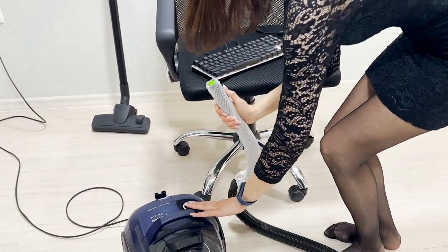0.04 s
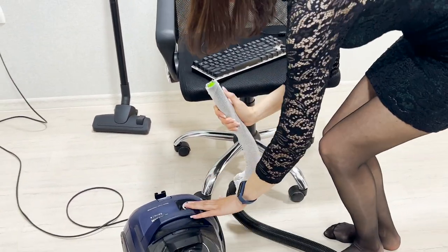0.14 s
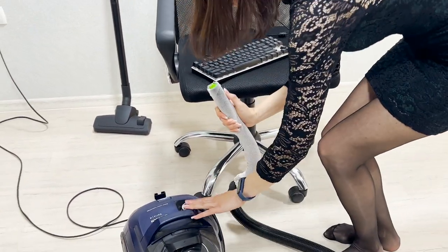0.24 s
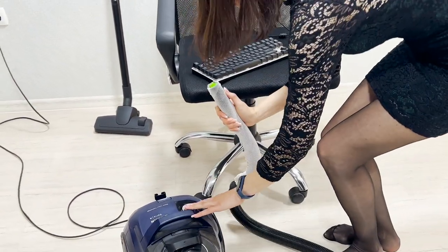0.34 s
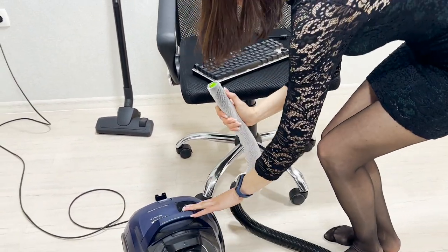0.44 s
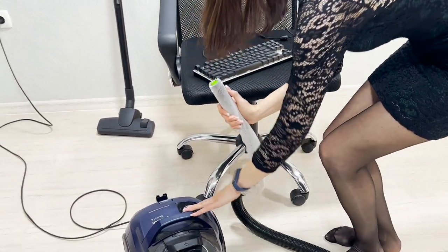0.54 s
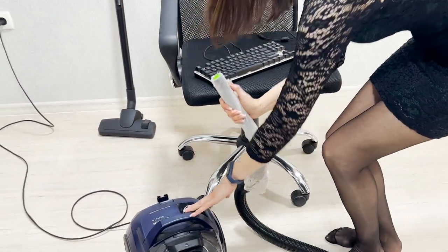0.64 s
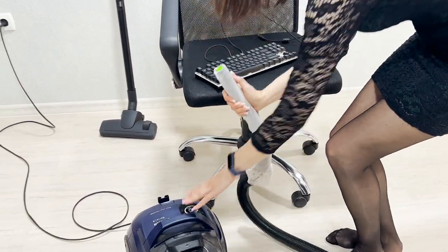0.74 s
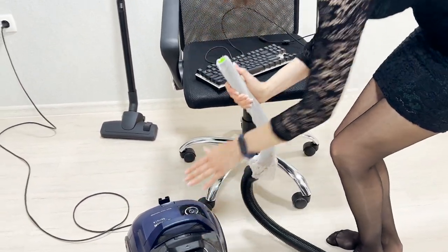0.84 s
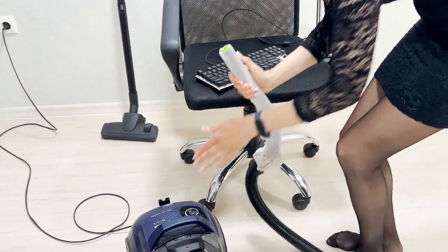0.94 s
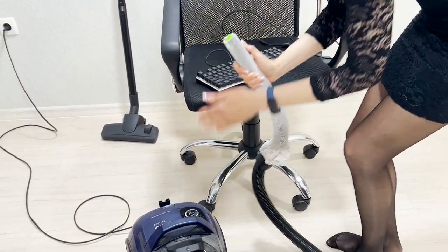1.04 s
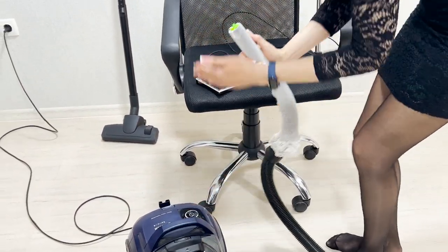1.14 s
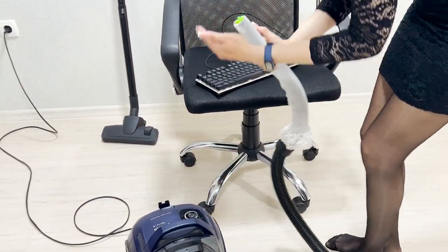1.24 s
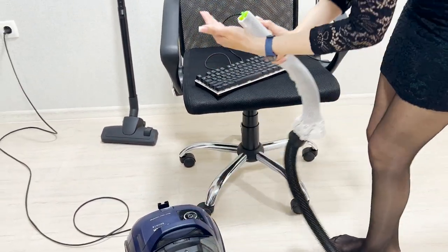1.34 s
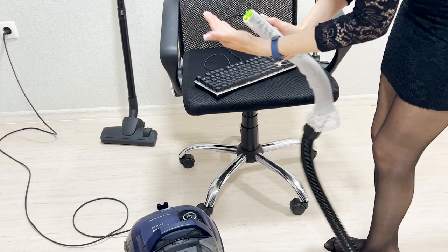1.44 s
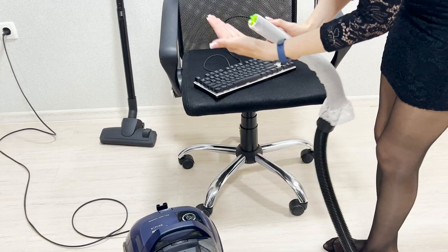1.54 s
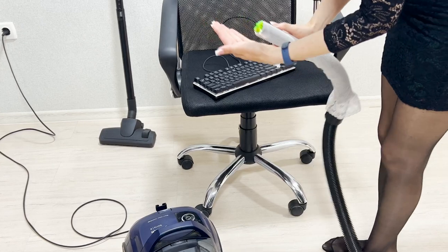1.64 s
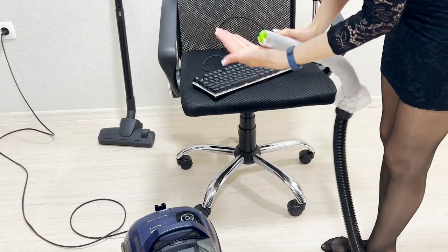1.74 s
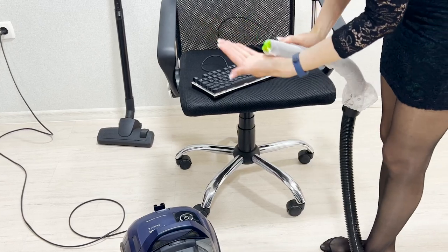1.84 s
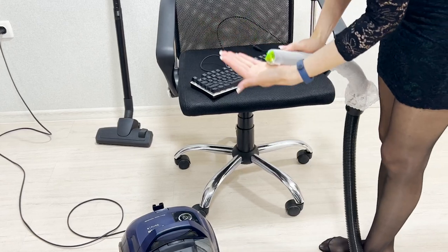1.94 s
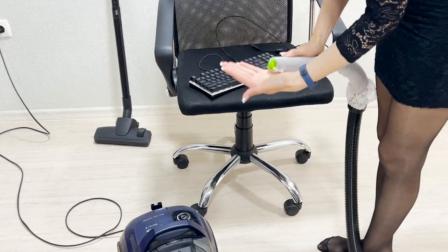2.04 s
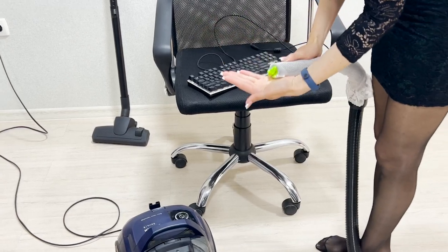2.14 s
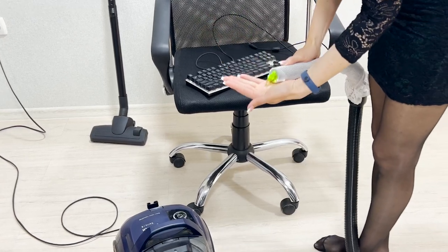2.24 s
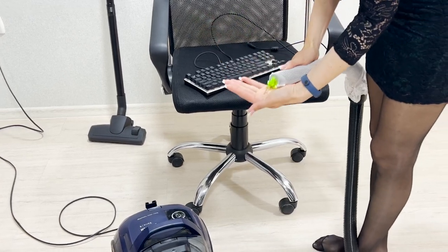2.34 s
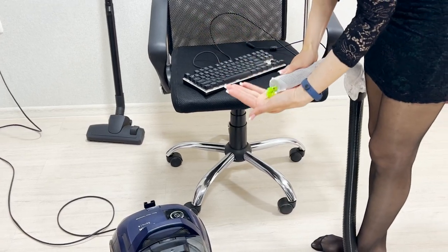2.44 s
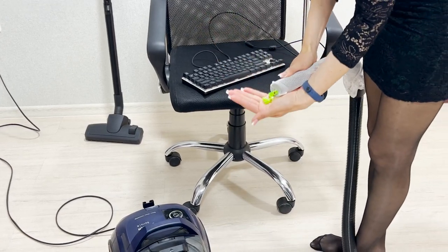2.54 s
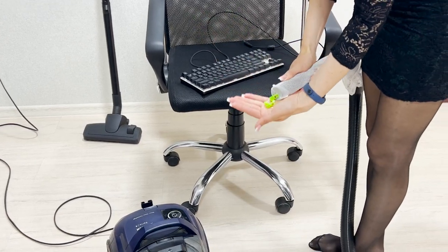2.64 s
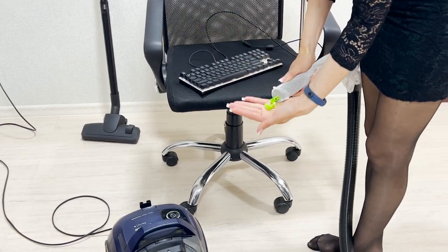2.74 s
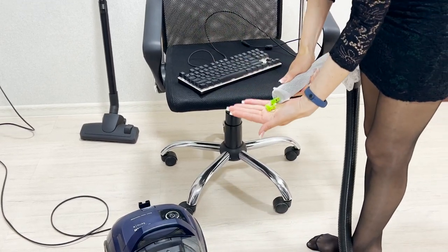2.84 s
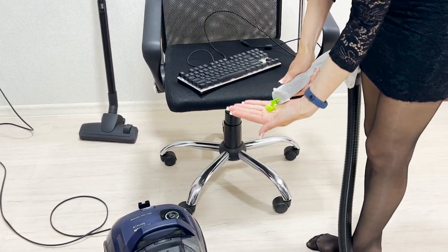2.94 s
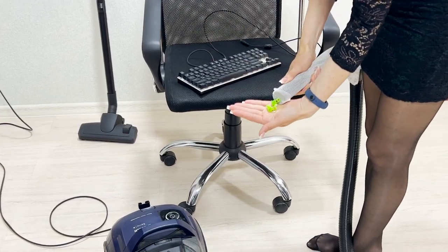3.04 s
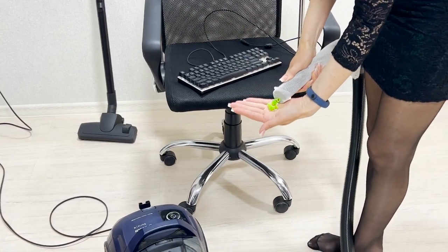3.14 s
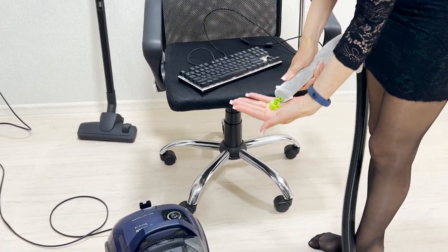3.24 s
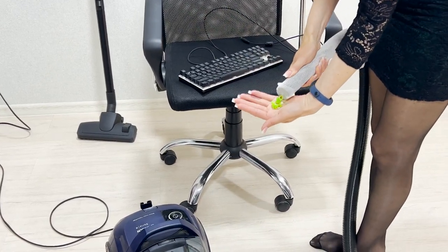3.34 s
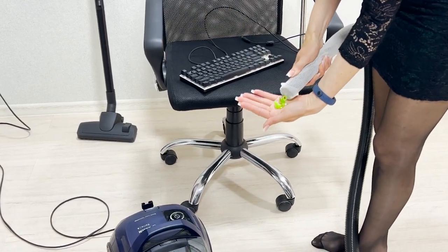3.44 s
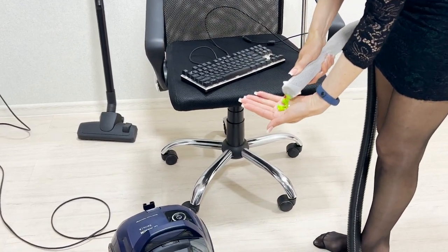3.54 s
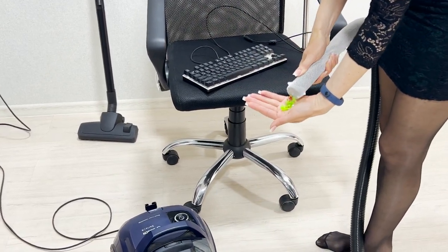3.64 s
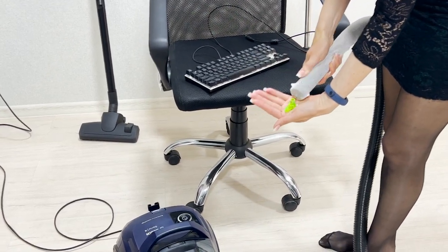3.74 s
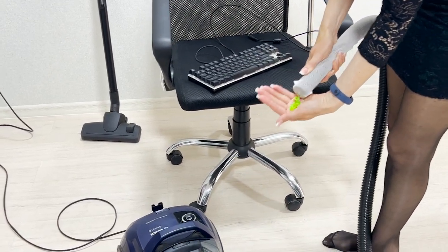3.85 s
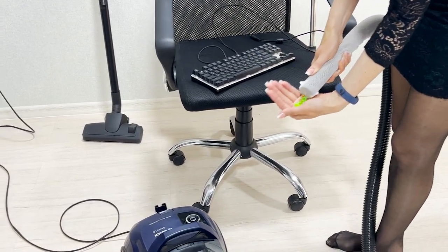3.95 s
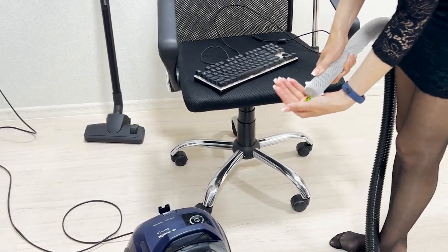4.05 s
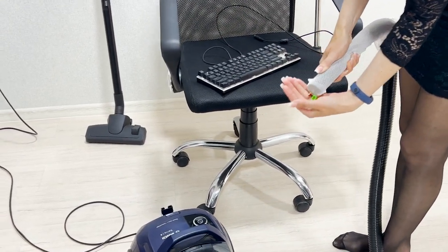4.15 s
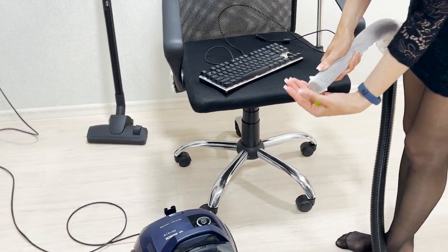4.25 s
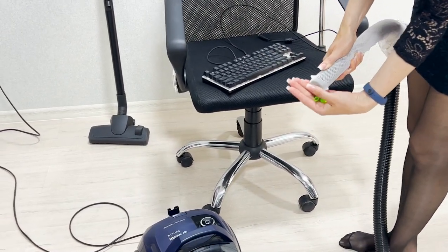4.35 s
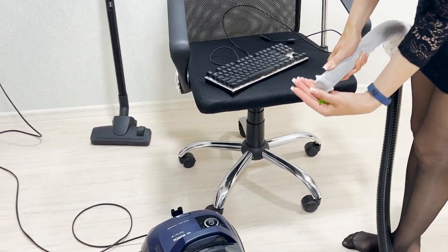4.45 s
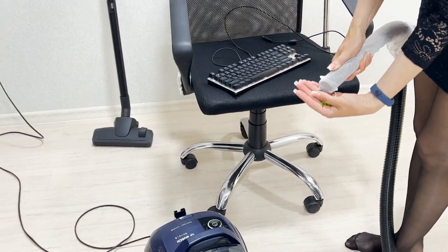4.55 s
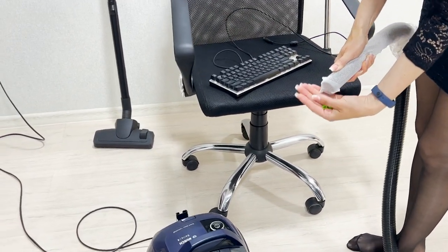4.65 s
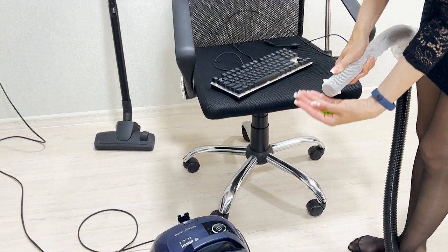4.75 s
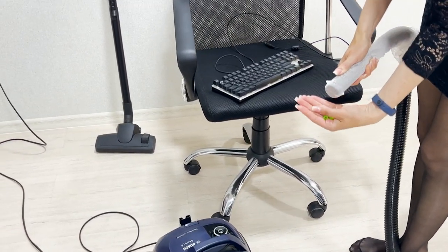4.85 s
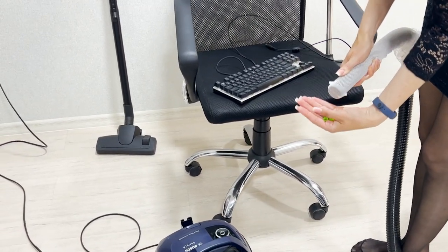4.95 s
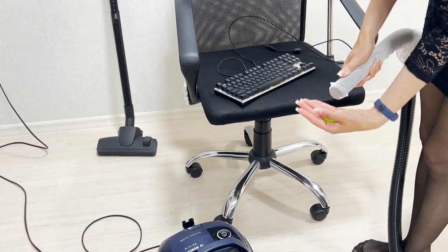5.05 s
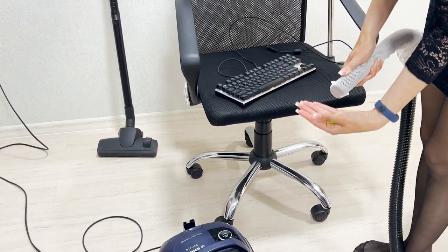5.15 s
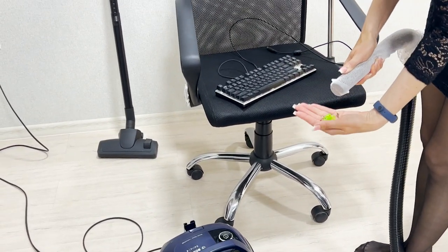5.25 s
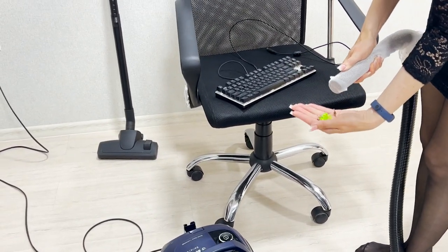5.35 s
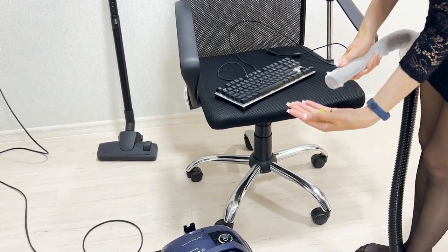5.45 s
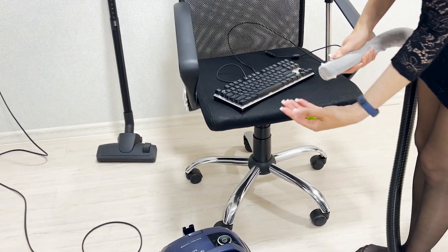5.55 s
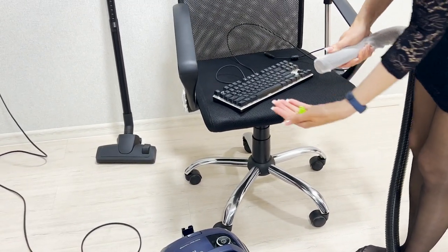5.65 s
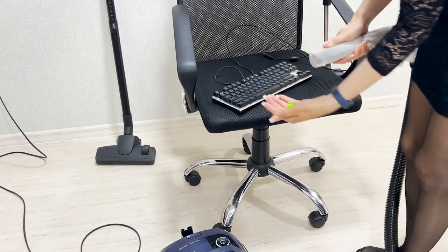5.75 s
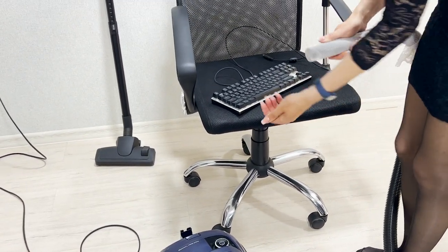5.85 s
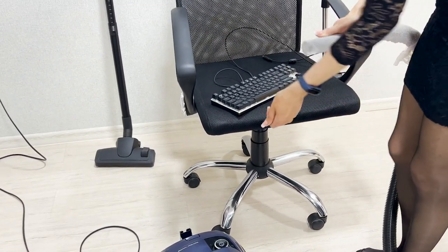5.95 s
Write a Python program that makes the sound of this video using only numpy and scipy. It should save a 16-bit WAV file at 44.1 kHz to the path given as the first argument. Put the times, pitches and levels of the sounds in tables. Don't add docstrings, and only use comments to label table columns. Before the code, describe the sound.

In a small bare room with a hard floor, a canister vacuum cleaner runs at full speed: broad roaring air, sharp exhaust hiss and a high fan whine. At about 0.6 s it is switched off, with the hiss lifting briefly around 0.7 s. The pitch falls quickly at first, then more gradually; treble fades first, and by 2 to 3 s mostly softer roar and sliding tones remain. From 2.2 to 3.6 s the handled hose gives dull low booms; around 3.2 to 3.6 s its cloth cover rustles with a cluster of crisp snaps. The thin falling whine continues until about 4.7 s, ending as a soft hollow plastic knock rings with short room echo. Near 5.0 s a foot steps and scuffs lightly. Faint low floor thuds from shifting feet occur throughout. Small bright ticks at 5.4 and 6.0 s stand out in near silence. Stereo, close pickup.

```python
import sys
import numpy as np
from scipy import signal
from scipy.fft import rfft, irfft, next_fast_len
from scipy.io import wavfile
from scipy.ndimage import map_coordinates

SR = 44100
rng = np.random.default_rng(int(sys.argv[2]) if len(sys.argv) > 2 else 0)


def wrap_up_sound(samples):
    columns = np.atleast_2d(samples).T
    tamed = np.clip(columns, -1, 1)
    steps = np.round(tamed * 32767).astype(np.int16)
    wavfile.write(sys.argv[1], SR, steps)


def linear_from_db(decibels):
    return 10 ** (np.asarray(decibels, float) / 20)


N = 264600
T = np.arange(N) / SR

RUN_HZ, CREEP_HZ_PER_S = 547, 7
DRAG_HZ, VISCOUS_HZ, COAST_PER_S, REST_S = 161.96, 12.58, .25674, 5.3544
TONES_END_S = 4.72

# [level at full speed/dB, slope/dB per octave of speed, knee/octaves down, extra slope beyond/dB per octave]
AIR_NOISES = [
    (-41, 11, 1.4, -6.5),
    (-32, 10.5, 1.44, -0.5),
    (-35, 9.5, 1.376, 37.5),
    (-26.5, 16.5, 1.25, 22),
]
KNEE_OCT = 0.17
# [f/Hz, level/dB]
DRONE_COLOUR = [(60, -44), (95, -8), (145, 0), (190, -4.5), (260, -1), (380, -3.5), (520, -32.5)]
ROAR_COLOUR = [(280, -27), (400, -1), (700, -0.5), (1300, -1.5), (1700, -8.5), (2600, -13), (3300, -21)]
RUSH_COLOUR = [(1200, -28.5), (1800, -1), (2700, 0.5), (3800, 1.5), (5000, 4), (5600, -5), (7000, -31.5)]
HISS_COLOUR = [(4500, -24.5), (5800, -6), (6500, -4), (7500, -3.5), (8800, -7.5), (10000, -5), (12000, -10),
               (15000, -8), (16000, -12)]
# [f/Hz, width/Hz, level/dB]
HOUSING_PEAKS = [(141.5, 9.7, 2.5), (187, 19, 3.5), (570, 17, -5), (618, 25, -5.5), (874, 19, -5.5),
                 (1192, 77, 3), (1700, 68, -5.5), (4983, 23, -3), (6500, 180, 5), (6940, 100, -9),
                 (7330, 17, -3), (8170, 74, -3.5)]
ROAR_SPLIT_HZ = 1800
ROAR_TOP_DB_PER_OCT, ROAR_TOP_KNEE_OCT, ROAR_TOP_EXTRA_DB_PER_OCT = 2, 1.93, 12.3
UNCOVER_S, UNCOVER_LENGTH_S, UNCOVER_DB = 0.71, .17, 1.8
SLEEVE_RUSH_DB, SLEEVE_DRONE_DB = -5, 9

# [order/turns, level at full speed/dB, slope/dB per octave of speed, lowest f/Hz, highest f/Hz let out]
SHAFT_TONES = [
    (1, -47.8, 4.4, 205, 700),
    (4.42, -62, -2, 545, 930),
    (9, -44.3, 6.3, 505, 6000),
    (20.04, -67.5, 2.4, 540, 3150),
    (40.1, -63.4, 4.6, 1900, 3600),
]
EDGE_DB_PER_OCT = 140
# [f/Hz, width/Hz, level/dB]
CASING_MODES = [(253, 61, 4), (296, 19, -15), (366, 40, 10), (453, 31, 7), (548, 10, 4), (580, 54, 6),
                (800, 180, 8), (1018, 73, 4), (1208, 109, 13), (1500, 350, -8), (2317, 230, 4),
                (2978, 133, 3), (3413, 465, -7), (4322, 505, 4)]
# [order/turns, t/s, length/s, level/dB, smear/Hz]
FAN_WHISTLES = [
    (15, .87, .17, -33, 480),
    (14.05, 1.2, .17, -43, 350),
    (4.42, 2.36, .07, -47, 3),
    (71.6, 2.29, .07, -66, 200),
    (20.04, 2.75, .3, -71, 10),
    (11.8, 3.95, .25, -69, 40),
    (60, 4.4, .25, -92, 60),
    (80, 4.5, .14, -89, 60),
]

# [start t/s, end of hold t/s, level/dB, rise/dB per s, fall/dB per s]
SLEEVE_RUSTLE = (3.23, 3.46, -69.5, 42, 75)
# [f/Hz, level/dB]
CLOTH_COLOUR = [(1500, -28), (3000, -12.5), (5200, -9), (6200, 1.5), (7200, -4), (9000, -2), (13000, -9),
                (16000, -11)]
# [t/s, level/dB]
HOSE_BOOMS = [
    (2.19, -68.5),
    (2.38, -55.5),
    (2.556, -55),
    (2.8, -56),
    (3.104, -61.5),
    (3.224, -54),
    (3.49, -56.5),
    (3.64, -69),
]
HOSE_RISE, HOSE_FALL = 170, 62
# [f/Hz, level/dB]
BOOM_COLOUR = [(220, -17.0), (265, -5), (300, 1.0), (350, -37.0)]
# [t/s, peak level/dB, colour f/Hz, width/octaves, time to fall 60 dB/s]
SNAPS = [(2.451, -52, 6760, 2.2, 0.015), (3.31, -40.5, 8460, 2.8, 0.025), (3.353, -44, 6140, 1.5, 0.015),
         (3.361, -48, 6310, 1.2, 0.018), (3.3903, -57, 5980, 1.2, 0.015), (3.4418, -47, 8990, 2.1, 0.008),
         (3.4477, -44, 6500, 1.1, 0.014), (3.4628, -56.5, 7010, 1.2, 0.015), (3.481, -49, 5960, 1.6, 0.021),
         (3.6248, -49.5, 8500, 1.5, 0.008), (5.3554, -76.5, 5350, 1.1, 0.015),
         (5.4455, -49, 14200, 1.02, 0.06), (5.8954, -68, 8320, 1.1, 0.016),
         (5.9846, -50.5, 10010, 1.2, 0.022)]
# [t/s, peak level/dB, colour f/Hz, width/octaves, time to fall 60 dB/s]
FURTHER_SNAPS = [
    (4.657, -61, 6500, 0.96, .03),
    (4.979, -56.5, 595, 0.73, 0.28),
]

KNOCK_S, KNOCK_DB = 4.729, -43
# [f/Hz, level/dB, time to fall 60 dB/s]
HOLLOW_MODES = [(486, -3, 0.3), (582, 1, 0.37), (627, -1, 0.18), (940, -24, 0.61), (1040, -32, 0.55),
                (1248, -12, 0.29), (1480, -10, 0.2), (2000, -24, 0.3), (2350, -28, 0.25), (6600, -30, 0.25),
                (158.6, -8.5, 0.56), (227.5, -10.0, 0.34)]
# [f/Hz, level/dB]
CRACK_COLOUR = [(100, 3), (700, 5.5), (2200, -3.5), (3300, -12.5), (5500, -15.5), (6800, -7.5),
                (8500, -22), (11000, -30), (14000, -30)]

# [t/s, drag level/dB, scrape level/dB, bump level/dB]
SCUFFS = [
    (5.0, -67, -89, -74),
    (5.09, -64.5, -80, -63.5),
]
SCUFF_RISE, SCUFF_FALL = 420, 150
# [f/Hz, level/dB]
DRAG_COLOUR = [(200, -18.0), (400, -5), (1000, -6.5), (1800, -22.5)]
SCRAPE_COLOUR = [(2000, -20.5), (3100, -7.0), (4200, -24.5)]
BUMP_COLOUR = [(100, -18), (150, -5), (250, -4), (330, -15)]
# [t/s, floor rumble level/dB]
WEIGHT_SHIFTS = [(0.0, -61), (.2, -53), (.64, -50.5), (1.1, -58), (2.16, -59.5), (2.9, -59), (3.14, -62),
                 (3.31, -64), (3.78, -65), (3.98, -62.5), (4.28, -58.5), (4.8, -53), (5.17, -57),
                 (6.02, -59)]
FEET_RISE, FEET_FALL = 84, 86
STANCE_DB, SETTLE_S, SETTLED_DB = -64, 5.3, -70.5
# [f/Hz, level/dB]
THUD_COLOUR = [(15, -41), (28, -14.5), (40, -1.5), (55, -2.5), (75, -2), (100, -13), (130, -27.5)]
# [f/Hz, level/dB]
QUIET_COLOUR = [(60, -31.5), (90, -1.5), (110, -7.5), (135, -13.5), (300, -20), (760, -25.5), (1150, -17.5),
                (1650, -21), (2100, -35), (4400, -40), (9000, -46), (11700, -60)]
QUIET_DB = -70.5

# [f/Hz, time to fall 60 dB/s]
ROOM_DECAY = [(150, 0.41), (600, 0.73), (2000, 0.65), (7000, 0.26), (14000, 0.062)]
# [f/Hz, likeness/0-1]
LIKENESS = [(60, .94), (250, 0.89), (700, 0.6), (1400, 0.06), (2300, 0.8), (4000, 0.5), (5400, 0.5),
            (6600, 0.84), (12000, .87)]
# [f/Hz, level/dB]
LEFT_OVER_RIGHT = [(60, 2), (300, 3.5), (800, 4.5), (1500, 1), (2200, 1.5), (4500, 2), (5500, 0)]
# [f/Hz, lag/radians]
PORT_LAG = [(0, 0), (1000, -.3), (1450, -2.6), (1750, 0), (3200, -.5), (5000, 0), (5700, 1), (6600, .1),
            (7400, .4), (9900, 3.14), (12900, 6.28), (15600, 9.5)]
# [low f/Hz, high f/Hz, edge scatter/Hz]
MID_GAPS = [(9550, 10400, 170), (15250, 22050, 70)]
# [low f/Hz, high f/Hz, edge scatter/Hz]
SIDE_GAPS = [(12300, 13750, 170), (16000, 22050, 40)]


def airflow():
    down = np.log2(RUN_HZ / shaft())

    def beyond(knee):
        return KNEE_OCT * np.logaddexp(0, (down - knee) / KNEE_OCT)

    drone, roar, whoosh, hiss = [linear_from_db(db - slope * down - extra * beyond(knee))
                                 for db, slope, knee, extra in AIR_NOISES]
    squeeze = sleeve()
    drone = np.hypot(drone, linear_from_db(SLEEVE_DRONE_DB) * squeeze)
    whoosh = np.hypot(whoosh, linear_from_db(SLEEVE_RUSH_DB) * squeeze)
    hiss = hiss * linear_from_db(UNCOVER_DB * np.exp(-((T - UNCOVER_S) / UNCOVER_LENGTH_S) ** 2))
    flutter = wobble(14)
    air = drone * linear_from_db(0.98 * wobble(9)) * rush(DRONE_COLOUR, peaks_db=-3)
    roaring = roar * linear_from_db(0.72 * flutter) * rush(ROAR_COLOUR, peaks_db=-2.5)
    top = filtered(roaring, lambda hz: hz ** 4 / (hz ** 4 + ROAR_SPLIT_HZ ** 4))
    top_db = ROAR_TOP_DB_PER_OCT * np.minimum(down, 1) - ROAR_TOP_EXTRA_DB_PER_OCT * beyond(ROAR_TOP_KNEE_OCT)
    air += roaring + top * (linear_from_db(top_db) - 1)
    air += whoosh * linear_from_db(0.25 * flutter) * rush(RUSH_COLOUR, peaks_db=-6.0)
    air += hiss * linear_from_db(.6 * flutter) * rush(HISS_COLOUR, peaks_db=-7)
    ripple = rng.standard_normal(SR // 50)

    def comb(hz):
        return linear_from_db(2.0 * np.minimum(hz / 600, 1) * map_coordinates(ripple, [hz / 25]) - 0.3)

    return filtered(air, comb)


def shaft():
    angle = np.arctan(VISCOUS_HZ / DRAG_HZ) + COAST_PER_S * (REST_S - T)
    coasting = DRAG_HZ * np.tan(angle) - VISCOUS_HZ
    return np.clip(coasting, 1, RUN_HZ + CREEP_HZ_PER_S * T)


def fan():
    shaft_hz = shaft()
    turns = 2 * np.pi * np.cumsum(shaft_hz * (1 + .0025 * wobble(40))) / SR
    turning = np.clip((TONES_END_S - T) / 0.025, 0, 1)
    tones = np.zeros(N)
    for order, db, slope, low_hz, high_hz in SHAFT_TONES:
        hz = order * shaft_hz[::64]
        casing_db = sum(lift / (1 + (2 * (hz - c) / w) ** 2) for c, w, lift in CASING_MODES)
        outside = np.maximum(0, np.log2(np.maximum(low_hz / hz, hz / high_hz)))
        level_db = db + slope * np.log2(hz / order / RUN_HZ) + casing_db - EDGE_DB_PER_OCT * outside
        flutter = 1 + .18 * wobble(25) + .35 * wobble(70)
        tones += linear_from_db(np.interp(T, T[::64], level_db) - 0.5) * flutter * np.sin(order * turns)
    for order, s, length, db, smear_hz in FAN_WHISTLES:
        smear = wobble(smear_hz)
        if smear_hz < 5:
            smear = 1 + smear / 10
        swell = np.exp(-((T - s) / length) ** 2)
        tones += linear_from_db(db) * swell * smear * np.sin(order * turns)
    return tones * turning


def sleeve():
    start, end, db, rise, fall = SLEEVE_RUSTLE
    return swells([start], [db], rise, fall, end - start)


def rustle():
    return sleeve() * linear_from_db(2 * wobble(60)) * rush(CLOTH_COLOUR)


def hose_boom():
    return swells(*np.transpose(HOSE_BOOMS), HOSE_RISE, HOSE_FALL) * rush(BOOM_COLOUR)


def ticks():
    size = 4096
    out, t = np.zeros(N + size), np.arange(size) / SR
    for s, db, hz, octaves, t60 in SNAPS + FURTHER_SNAPS:
        burst = linear_from_db(-60 * t / t60) * rng.standard_normal(size)
        snap = filtered(burst, lambda f: np.exp(-(np.log2(f / hz + 1e-6) / octaves) ** 2))
        out[round(s * SR):][:size] += linear_from_db(db) * snap / abs(snap).max()
    return out[:N]


def knock():
    t = np.maximum(T - KNOCK_S, 0)
    ring = sum(linear_from_db(db - 60 * t / (0.68 * t60)) * np.sin(2 * np.pi * hz * t)
               for hz, db, t60 in HOLLOW_MODES)
    ring = ring * (1 - np.exp(-t / 0.0072))
    crack = filtered(rng.standard_normal(N), lambda f: linear_from_db(along(CRACK_COLOUR, f)))
    crack_gain = linear_from_db(3.5 - 60 * t / 0.18) * (1 - np.exp(-t / 0.0018))
    return linear_from_db(KNOCK_DB) * (ring + crack_gain * crack) * (t > 0)


def scuff():
    times, *levels = np.transpose(SCUFFS)
    drag, scrape, bump = [swells(times, dbs, SCUFF_RISE, SCUFF_FALL) for dbs in levels]
    return drag * rush(DRAG_COLOUR) + scrape * rush(SCRAPE_COLOUR) + bump * rush(BUMP_COLOUR)


def feet():
    stance = linear_from_db(np.interp(T, [SETTLE_S, SETTLE_S + 0.23], [STANCE_DB, SETTLED_DB]))
    load = np.hypot(stance, swells(*np.transpose(WEIGHT_SHIFTS), FEET_RISE, FEET_FALL))
    return load * rush(THUD_COLOUR)


def quiet_room():
    return linear_from_db(QUIET_DB) * rush(QUIET_COLOUR)


def room(x):
    hz, t, z = signal.stft(pair(SR // 2), SR, nperseg=256)
    fading = z * linear_from_db(-60 * t / along(ROOM_DECAY, hz)[:, None])
    tail = signal.istft(fading, SR, nperseg=256)[1]
    delayed = np.pad(x, (130, 0))[None]
    return signal.fftconvolve(delayed, tail / np.linalg.norm(tail[0]), axes=1)[:, :N]


def rush(spectrum, peaks_db=-60):
    colour = [(10, -120)] + spectrum + [(20000, -120)]

    def response(hz):
        bumps = sum(linear_from_db(db) / (1 + (2 * (hz - c) / w) ** 2) for c, w, db in HOUSING_PEAKS)
        return linear_from_db(along(colour, hz)) * (1 + linear_from_db(peaks_db) * bumps)

    x = filtered(pair(N), response)
    return x / x.std()


def pair(size):
    def mix(hz):
        turn = np.arccos(np.clip(along(LIKENESS, hz), 0, 1)) / 2
        return np.array([np.cos(turn), np.sin(turn)])

    mid, side = filtered(rng.standard_normal((2, size)), mix)
    return np.array([mid + side, mid - side])


def swells(times, dbs, rise, fall, hold=0):
    t = T[::64]
    gains = [linear_from_db(db - rise * np.maximum(s - t, 0) - fall * np.maximum(t - s - hold, 0))
             for s, db in zip(times, dbs)]
    return np.interp(T, t, np.sqrt(np.sum(np.square(gains), axis=0)))


def wobble(rate):
    return map_coordinates(rng.standard_normal(int(N * rate / SR) + 4), [T * rate])


def along(points, hz):
    f, v = np.transpose(points)
    return np.interp(np.log(hz + 1), np.log(f + 1), v)


def filtered(x, response):
    m = next_fast_len(x.shape[-1] + 8192)
    return irfft(rfft(x, m) * response(np.fft.rfftfreq(m, 1 / SR)), m)[..., :x.shape[-1]]


def dropped(x, bands):
    hz, t, z = signal.stft(x, SR, nperseg=1024)
    for low, high, scatter in bands:
        steps = np.round(rng.normal(0, .8, (2, len(t))))
        jump = scatter * np.repeat(steps, 2, axis=1)[:, :len(t)]
        z = z * ((hz[:, None] < low + jump[0]) | (hz[:, None] > high + jump[1]))
    return signal.istft(z, SR, nperseg=1024)[1][:N]


def scene():
    tones, snaps, bump = fan(), ticks(), knock()
    whine = tones + room(linear_from_db(-12) * tones)
    hits = snaps + linear_from_db(2.0) * bump + room(linear_from_db(1.5) * snaps) + room(linear_from_db(-5.5) * bump)
    movement = rustle() + hose_boom() + scuff() + feet()
    return whine + hits + airflow() + movement + quiet_room()


def roll_off(x):
    return signal.sosfilt(signal.butter(12, 16120, fs=SR, output="sos"), x)


def record(dry):
    def ports(hz):
        level = linear_from_db(along(LEFT_OVER_RIGHT, hz) * [[.5], [-.5]])
        return level * np.exp(1j * np.interp(hz, *np.transpose(PORT_LAG)) * [[-.5], [.5]])

    left, right = filtered(dry, ports)
    mid = dropped(left + right, MID_GAPS) / 2
    side = dropped(left - right, SIDE_GAPS) / 2
    return roll_off(np.array([mid + side, mid - side]))


dry = scene()
out = record(dry)
wrap_up_sound(out)
```